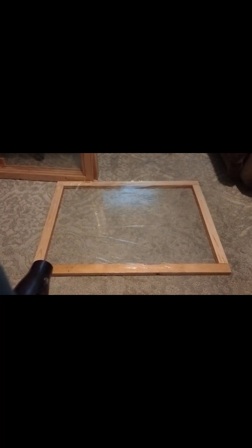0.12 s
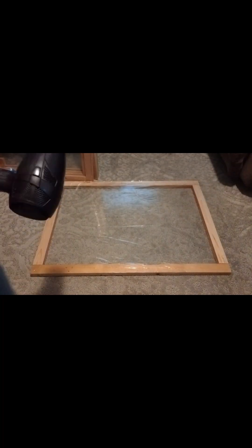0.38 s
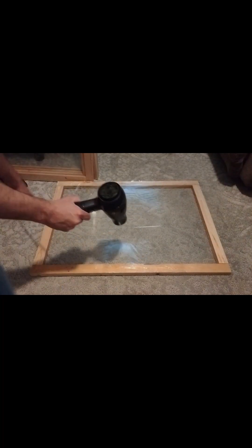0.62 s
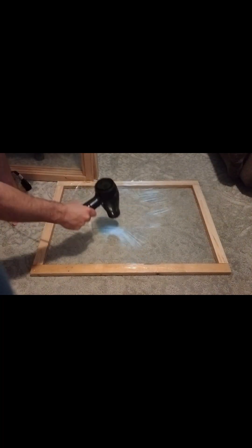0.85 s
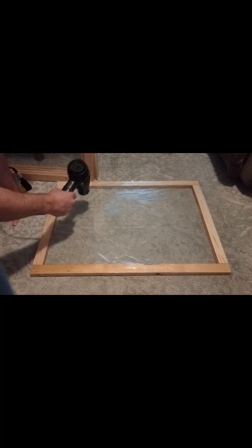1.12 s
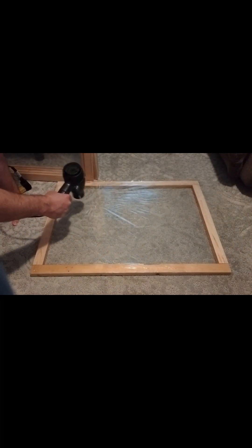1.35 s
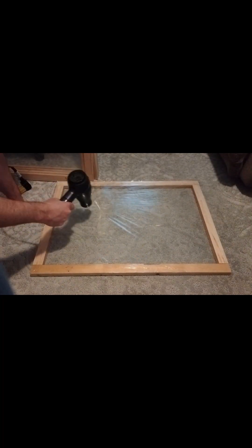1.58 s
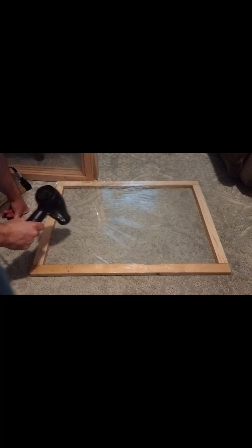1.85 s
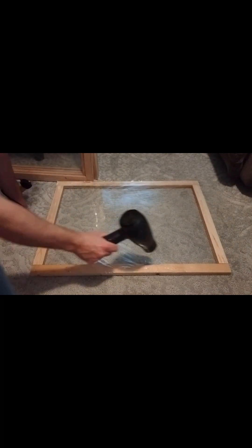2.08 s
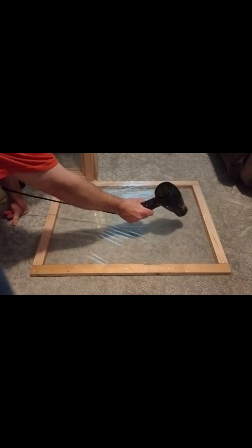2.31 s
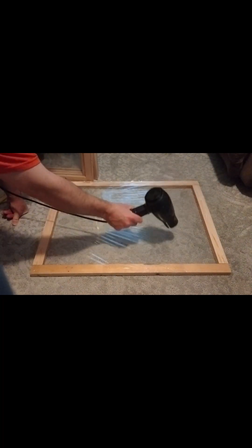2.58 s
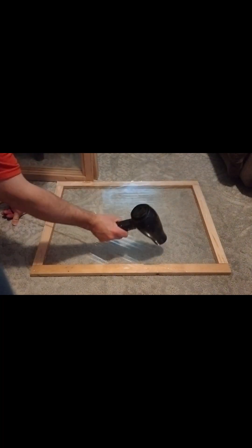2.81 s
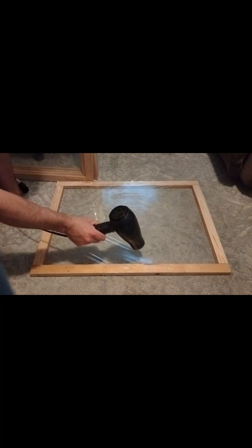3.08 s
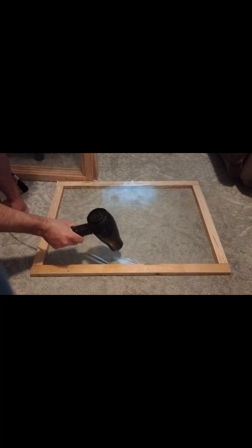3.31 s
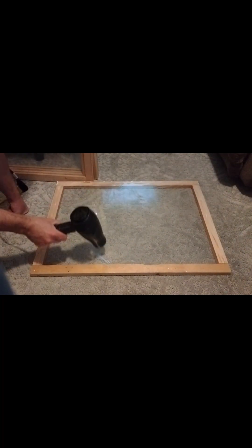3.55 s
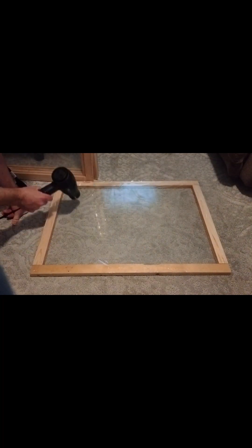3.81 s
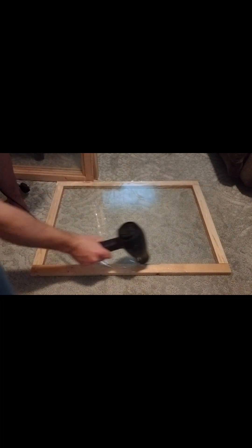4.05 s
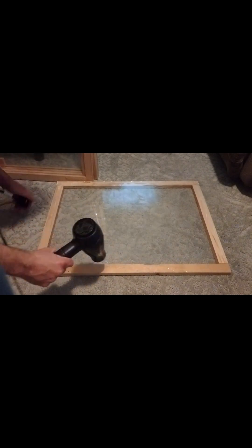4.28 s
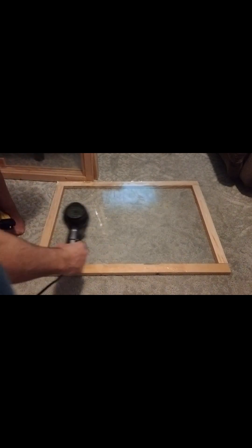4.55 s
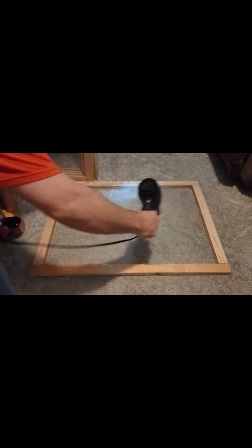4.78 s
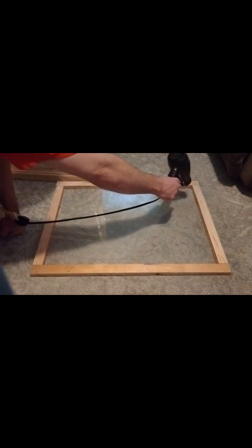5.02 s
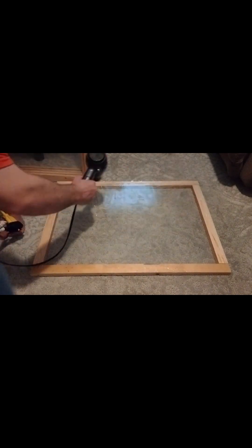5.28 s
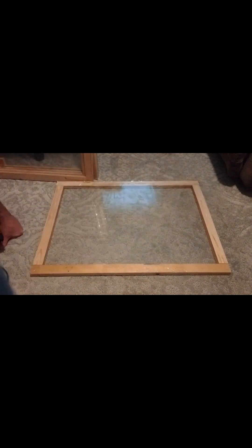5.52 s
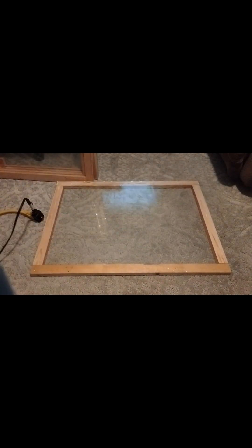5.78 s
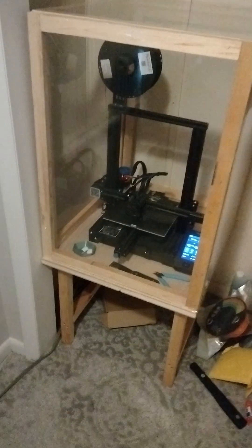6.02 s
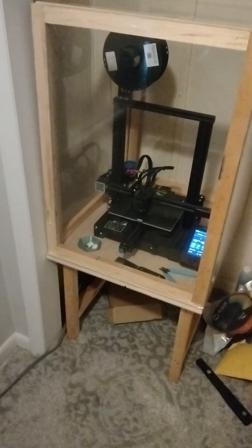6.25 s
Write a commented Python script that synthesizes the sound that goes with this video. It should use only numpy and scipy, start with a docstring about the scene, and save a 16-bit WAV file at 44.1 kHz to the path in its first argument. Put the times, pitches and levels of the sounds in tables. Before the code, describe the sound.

Close handheld hair dryer clicks on, blasts airy hiss with a thin fluttering whine in a carpeted room, then stops abruptly with soft thuds.

```python
"""Carpeted room, two microphone ports close by: a hand clicks a hair dryer on, sweeps it over plastic film,
clicks it off and puts it down. Shaped noise makes rush and film, gliding partials the fan's whine, struck
modes the clicks, damped sines the thuds, and brushing and faint room noise lie behind.
Time is hurried: short cross-faded snippets make rush and whine flicker and cut the tails of blows short."""
import sys
import numpy as np
from scipy import signal
from scipy.fft import rfft, irfft, next_fast_len
from scipy.io import wavfile
from scipy.ndimage import uniform_filter1d

SR = 44100
rng = np.random.default_rng(int(sys.argv[2]) if len(sys.argv) > 2 else 0)


def rack_gain(trim_db):
    """Turn a fader trim in dB into the linear factor to multiply a signal by."""
    fader = np.asarray(trim_db, float)
    return 10 ** (fader / 20)


def int16_out(signal):
    """Quantize to a 16-bit WAV file."""
    q = np.round(np.clip(np.atleast_2d(signal).T, -1, 1) * 32767)
    wavfile.write(sys.argv[1], SR, q.astype(np.int16))


N = 281358

# air stream spinning up, sweeping about and spinning down: t/s, hiss level/dB, fizz over hiss/dB,
# howl over hiss/dB, howl centre f/Hz, left-right/dB
AIR = [(.805, -66, 4, 13, 905, 4), (.865, -42.5, 12, 11, 900, 5), (.918, -44.5, 10, 10, 1300, 3),
       (.94, -25.5, 3.5, 3, 1480, 2), (1.1, -26, 5.5, 1, 1350, 0), (1.2, -24.5, 4.5, 0, 1400, 0),
       (1.285, -26.5, 5, 3, 1520, 1.5), (1.315, -32, 4.5, -0.5, 1620, 0), (1.7, -32.5, 1, 0.5, 1550, 1.5),
       (2.07, -32.5, 2.5, -4, 1320, 1.5), (2.4, -32.5, 1.5, -1.5, 1600, 4),
       (2.58, -31.5, 0.5, -1.5, 1490, 2.5), (2.72, -30, -1, -6, 1350, -2.5), (2.95, -35, 3, 6, 1230, 1),
       (3.2, -34, 2, -3, 1310, 1.5), (3.45, -34, 5, -2.5, 1360, 1), (3.85, -31.5, 4, -5.5, 1380, 0.5),
       (4.1, -33.5, 7, -2.5, 1270, 1.5), (4.35, -32.5, 0, -4, 1300, 2), (4.55, -30, 1.5, -12, 1190, 1.5),
       (4.63, -30.5, 0, -4, 1430, -1.5), (4.67, -32.5, 3.5, 3.5, 1470, 1), (5.03, -32, 1.5, 2.5, 1550, -1),
       (5.2, -32, 0.5, -1, 1570, 0.5), (5.35, -34, 2, -5, 1320, -1), (5.72, -35, 2.5, -1, 1570, 2.5),
       (5.83, -34, 6, 3, 1490, 1), (5.875, -36.5, 2.5, -7, 1350, 2.5), (5.915, -35, 7.5, 5.5, 1150, 4.5),
       (5.94, -63.5, 16, 14, 1100, -4), (5.98, -99, 4, 6, 1030, -2), (6.0, -105, 6, 9, 1040, -9)]
HZ, HOP = np.fft.rfftfreq(512, 1 / SR), 128  # bins and step of the short-time spectra
FRAME_S = np.arange(N // HOP + 5) * HOP / SR
SNIPPET_S, SNIPPET_CENTRE_S = 1024 / SR, .0093  # one snippet, the middle of the first
SLOW_FLICKER_S = .05  # step of a slower chance flicker


def evened(x):
    """Scales a signal to an rms of 1."""
    return x / np.sqrt(np.mean(x ** 2) + 1e-20)


def read(points, hz=HZ):
    """Reads a curve at the given frequencies, straight over log frequency."""
    f, value = np.transpose(points)
    return np.interp(np.log(hz + 1), np.log(f + 1), value)


def columns(rows, t):
    """Interpolates each column after the first at the times t."""
    s, *rest = np.transpose(rows)
    return [np.interp(t, s, c) for c in rest]


def add(mix, s, sound, pan_db):
    """Lays a sound into the mix at s seconds, leaning left by pan_db."""
    part = mix[:, round(s * SR):][:, :sound.shape[-1]]
    part += sound[..., :part.shape[1]] * rack_gain(np.array([[.5], [-.5]]) * pan_db)


def band(shape_db):
    """Spectrum shape scaled to power 1, bins x frames."""
    gain = rack_gain(shape_db.reshape(len(HZ), -1))
    return gain / np.sqrt((gain ** 2).mean(0))


def noise(magnitude, pan_db):
    """Two-port noise whose short-time spectrum follows the magnitude."""
    # how alike the two ports hear: f/Hz, likeness
    likeness = [(25, .6), (60, 0.79), (150, 0.99), (380, 0.88), (950, 0.56), (2380, 0.1), (5980, -0.17),
                (15000, 0.1)]
    # unequal microphone ports: f/Hz, left-right/dB
    port_lean = [(60, -0.5), (300, -0.5), (2400, -0.5), (5000, -6), (8500, 3.5), (12000, 4), (16000, -6)]
    a, b, c, d = rng.standard_normal((len(FRAME_S), len(HZ), 4)).T
    same = np.clip(read(likeness), -1, 1)[:, None]
    left = a + 1j * b
    right = same * left + np.sqrt(1 - same ** 2) * (c + 1j * d)
    white = np.sqrt(np.mean(signal.istft(left, nperseg=512, noverlap=384)[1] ** 2))
    lean_db = (read(port_lean)[:, None] + pan_db) / 2
    spectrum = np.array([left, right]) * magnitude * rack_gain([lean_db, -lean_db])
    return signal.istft(spectrum, nperseg=512, noverlap=384)[1][:, :N] / white


def snippets(t, seconds, count):
    """Random values, one per stretch of the given seconds, cross-faded."""
    centres = SNIPPET_CENTRE_S + np.arange(400) * seconds
    return np.array(columns(np.c_[centres, rng.standard_normal((400, count))], t))


def patches(count):
    """Random blotches, count bins high and frames long."""
    field = rng.standard_normal((len(FRAME_S), len(HZ))).T
    return evened(uniform_filter1d(uniform_filter1d(field, count[0], 0), count[1], 1))


def joins():
    """Gain of noise that dips at every cross-fade, a steady rasp at the snippet rate."""
    t = np.arange(N) / SR
    join_loss = .4  # share of power lost midway through a cross-fade of unrelated noise
    return evened(np.sqrt(1 - join_loss * np.sin(np.pi * (t - SNIPPET_CENTRE_S) / SNIPPET_S) ** 2))


def air():
    """Hiss, fizz, howl, casing roar and film flutter: noise bands whose levels flicker with each snippet."""
    # hiss spectrum: f/Hz, level/dB
    hiss_shape = [(4000, -36), (5500, 7.5), (6500, 8.5), (7300, 7), (8700, 8.5), (9600, 6.5), (10500, -5),
                  (12500, -6), (14500, 5.5), (15700, -3), (22000, -29)]
    # fizz spectrum: f/Hz, level/dB
    fizz_shape = [(100, -44), (900, -6.5), (1700, 0), (2300, -2), (3100, 0.5), (4300, -2.5), (5500, -6),
                  (7500, -17.5)]
    # casing roar spectrum: f/Hz, level/dB
    roar_shape = [(80, -42), (450, -12), (700, -24), (1000, 2), (1300, -2.5), (1700, -2), (2300, -18)]
    # film flutter spectrum: f/Hz, level/dB
    flutter_shape = [(25, -50), (60, -15), (110, 1.5), (170, -10.5), (300, -2.5), (460, -3), (580, -1),
                     (800, -3.5), (1100, -14.5)]
    usual_db, slack_max_db = -32, 20  # below this hiss level the roar holds up against the hiss
    roar_holds = 1  # share of the hiss's loss that the roar is spared
    flutter_lags = .43  # share of a louder hiss that the film does not follow
    hiss_db, fizz_db, howl_db, howl_hz, pan_db = columns(AIR, FRAME_S)
    excess_db = np.maximum(hiss_db - usual_db, 0)
    slack_db = np.clip(usual_db - hiss_db, 0, slack_max_db)
    whole, drift, *parts = snippets(FRAME_S, SNIPPET_S, count=7)
    slow_flickers = snippets(FRAME_S, SLOW_FLICKER_S, count=5)
    off = np.log((HZ[:, None] + 1) / howl_hz) - 0.006 * drift
    howl = -20 * np.log10(1 + (off / 0.15) ** 2)
    # spectrum, level over the hiss in dB, spread in dB of the layer's slower chance flicker
    layers = [(read(hiss_shape), .1, .7),
              (read(fizz_shape), fizz_db, .7),
              (read(roar_shape), -2 + roar_holds * slack_db, 1.5),
              (howl, howl_db, 3.),
              (read(flutter_shape), -2.5 - flutter_lags * excess_db, 1.5)]
    power = 0
    for part, slow, (shape, db, spread_db) in zip(parts, slow_flickers, layers):
        power = power + (band(shape) * rack_gain(db + 1.12 * part + spread_db * slow)) ** 2
    running = np.clip((FRAME_S - AIR[0][0]) / SNIPPET_S, 0, 1)
    level_db = hiss_db + 1.1 * whole + 1.62 * patches(count=(5, 12))  # flickers from snippet to snippet
    return noise(np.sqrt(power) * rack_gain(level_db) * running, pan_db + 2.4 * drift)


def rings():
    """Noise through two narrow resonances, stirred by the air stream and, before it starts, by clicks."""
    # moments when the barrel resonance speaks up: centre t/s, length/s, level/dB
    barrel_moments = [(.197, 0.032, -48.5), (.797, 0.011, -29), (.83, 0.069, -36.5), (.868, 0.12, -28.5),
                      (.91, 0.04, -31), (.94, 0.03, -33), (.98, 0.046, -38), (1.16, 0.28, -37.5),
                      (2.56, 0.15, -41), (3.83, 0.058, -45), (4.25, 0.14, -44), (4.52, 0.091, -44),
                      (4.67, 0.098, -36), (4.86, 0.11, -42), (5.03, 0.08, -55), (5.945, 0.08, -42)]
    # moments when the lower hum speaks up: centre t/s, length/s, level/dB
    hum_moments = [(1.03, 0.086, -61), (1.28, 0.092, -42), (1.86, 0.21, -43.5), (2.65, 0.13, -46),
                   (3.1, 1.7, -42.5), (4.62, 0.055, -40), (4.92, 0.04, -52), (5.15, 0.6, -45),
                   (5.56, 0.2, -39), (5.72, 0.22, -41)]
    t, out = np.arange(N) / SR, np.zeros((2, N))
    # moments, level over the hiss in between in dB, centre Hz, width Hz
    for rows, db, hz, width_hz in [(barrel_moments, -15, 778, 115), (hum_moments, -25, 510, 60)]:
        a, b = rng.standard_normal((N, 2)).T
        peak = signal.iirpeak(hz, hz / width_hz, SR)
        level = rack_gain(db + columns(AIR, t)[0] + 4 * snippets(t, SLOW_FLICKER_S, count=1)[0])
        for s, length, d in rows:
            level += rack_gain(d) * np.cos(np.pi * np.clip((t - s) / length, -.5, .5))
        # both ports hear them nearly alike
        once = signal.lfilter(*peak, [a + 0.66 * b, a - 0.15 * b])
        out += level * evened(signal.lfilter(*peak, once))
    return out


def whine():
    """Blade-rate partials; chance level and phase per snippet, partly unlike at the ports, make them flutter."""
    # partials of the fan blades: t/s, first, second and third partial rms level/dB
    partials = [(0.94, -31.0, -42.0, -55.0), (1.0, -27.0, -32.0, -38.0), (1.07, -32.0, -37.0, -35.0),
                (1.14, -31.0, -39.0, -38.0), (1.21, -38.0, -35.0, -44.0), (1.28, -31.0, -37.0, -44.0),
                (1.35, -38.0, -39.0, -55.0), (1.42, -29.0, -35.0, -47.0), (1.49, -28.0, -38.0, -52.0),
                (1.56, -32.0, -41.0, -52.0), (1.63, -35.0, -44.0, -51.0), (1.7, -38.0, -47.0, -58.0),
                (1.77, -37.0, -45.0, -60.0), (1.84, -38.0, -38.0, -46.0), (1.91, -37.0, -39.0, -58.0),
                (1.98, -35.0, -44.0, -50.0), (2.05, -39.0, -48.0, -52.0), (2.12, -41.0, -44.0, -46.0),
                (2.19, -34.0, -41.0, -46.0), (2.26, -33.0, -36.0, -45.0), (2.33, -33.0, -37.0, -50.0),
                (2.4, -31.0, -35.0, -46.0), (2.47, -35.0, -31.0, -49.0), (2.54, -32.0, -37.0, -46.0),
                (2.61, -32.0, -40.0, -44.0), (2.67, -35.0, -35.0, -41.0), (2.74, -40.0, -37.0, -39.0),
                (2.81, -39.0, -40.0, -44.0), (2.88, -40.0, -38.0, -40.0), (2.95, -45.0, -37.0, -45.0),
                (3.02, -35.0, -41.0, -47.0), (3.09, -34.0, -38.0, -44.0), (3.16, -35.0, -41.0, -42.0),
                (3.23, -42.0, -42.0, -43.0), (3.3, -35.0, -43.0, -41.0), (3.37, -32.0, -41.0, -40.0),
                (3.44, -33.0, -48.0, -43.0), (3.51, -33.0, -44.0, -47.0), (3.58, -35.0, -39.0, -42.0),
                (3.65, -35.0, -47.0, -42.0), (3.72, -39.0, -37.0, -42.0), (3.79, -37.0, -38.0, -41.0),
                (3.86, -36.0, -38.0, -42.0), (3.93, -38.0, -38.0, -44.0), (4.0, -37.0, -38.0, -49.0),
                (4.07, -34.0, -46.0, -51.0), (4.14, -39.0, -37.0, -47.0), (4.21, -38.0, -43.0, -56.0),
                (4.28, -40.0, -39.0, -48.0), (4.35, -35.0, -42.0, -60.0), (4.41, -35.0, -41.0, -51.0),
                (4.48, -43.0, -39.0, -48.0), (4.55, -37.0, -46.0, -59.0), (4.62, -36.0, -39.0, -47.0),
                (4.69, -36.0, -35.0, -51.0), (4.76, -28.0, -37.0, -46.0), (4.83, -27.0, -40.0, -47.0),
                (4.9, -42.0, -41.0, -54.0), (4.97, -45.0, -42.0, -50.0), (5.04, -41.0, -42.0, -52.0),
                (5.11, -42.0, -42.0, -47.0), (5.18, -43.0, -47.0, -49.0), (5.25, -34.0, -47.0, -47.0),
                (5.32, -36.0, -44.0, -47.0), (5.39, -37.0, -46.0, -50.0), (5.46, -38.0, -41.0, -55.0),
                (5.53, -33.0, -40.0, -49.0), (5.6, -41.0, -47.0, -49.0), (5.67, -40.0, -43.0, -51.0),
                (5.74, -36.0, -47.0, -50.0), (5.81, -39.0, -48.0, -49.0), (5.88, -37.0, -42.0, -48.0)]
    # blade rate: t/s, f/Hz
    blade_rate = [(.93, 1800), (1.0, 1826), (1.1, 1836), (1.6, 1822), (2.4, 1810), (2.8, 1803), (3.8, 1797),
                  (4.1, 1789), (4.8, 1787), (5.94, 1783)]
    beading = .55  # chance part of a partial in each snippet, against its steady part
    # spread of chance changes in level and in left-right balance, and their step time
    waver_db, roam_db, waver_s = 1.2, 4., .04
    t, out = np.arange(N) / SR, np.zeros((2, N))
    cycles = np.cumsum(columns(blade_rate, t)[0]) / SR
    for k, db in enumerate(columns(partials, t), 1):
        swell, slip, apart = snippets(t, SNIPPET_S, count=3)
        waver, roam = snippets(t, waver_s, count=2)
        bead = evened(abs(1 + beading * (swell + 1j * slip)))
        phase = 2 * np.pi * k * cycles + np.arctan2(beading * slip, 1 + beading * swell)
        phase = phase + .25 * np.sqrt(k) * np.array([apart, -apart])
        side_db = roam_db * roam / 2
        level = np.sqrt(2) * rack_gain(db + waver_db * waver + [side_db, -side_db])
        out += level * bead * np.sin(phase)
    return out * np.clip(np.minimum(t - partials[0][0], blade_rate[-1][0] - t) / .015, 0, 1)


def swells():
    """The howl briefly swells: short surges of one pitch, rising and falling alike."""
    # surges: centre t/s, peak level/dB, f/Hz, length/s
    surges = [(.937, -14, 1360, .016), (.935, -21, 3130, .022), (2.585, -23, 1390, .03),
              (4.907, -14, 1400, .016), (4.994, -22, 1500, .014), (5.762, -26, 1470, .02),
              (5.833, -25, 1550, .014), (5.862, -28, 1500, .012), (5.887, -24, 1150, .016)]
    out = np.zeros((2, N))
    for s, db, hz, length in surges:
        t = np.arange(0, length, 1 / SR)
        add(out, s - length / 2, rack_gain(db) * np.hanning(len(t)) * np.sin(2 * np.pi * hz * t), -1.5)
    return out


def spins():
    """A rough tone gliding as the fan gathers and loses speed."""
    # one glide up, one down: t/s, f/Hz, level/dB
    glides = [
        [(.805, 763, -60), (.82, 776, -37), (.85, 857, -33), (.89, 993, -27), (.92, 1190, -38),
         (.935, 1290, -43)],
        [(5.88, 1200, -58), (5.9, 1110, -46), (5.925, 980, -44), (5.95, 870, -52), (5.98, 790, -62)],
    ]
    out = np.zeros((2, N))
    for rows in glides:
        t = np.arange(rows[0][0], rows[-1][0], 1 / SR)
        hz, db = columns(rows, t)
        rough = evened(uniform_filter1d(rng.standard_normal(len(t)), 250))
        add(out, t[0], rack_gain(db) * (1 + 0.95 * rough) * np.sin(2 * np.pi * np.cumsum(hz) / SR), 0)
    return out


def blows(rows, rise, rattle_db, tick_db, slope_db):
    """A blow rings the casing, most near its brightest pitch, and rattles on until the snippet ends."""
    # casing modes: f/Hz, level/dB, t60/s
    modes = [(800, -5, 0.03), (1150, -5, 0.012), (1550, -2, 0.014), (2400, 2.5, 0.0034), (3150, 0, 0.0059),
             (4340, 2, 0.0034), (5900, 2.5, 0.0047)]
    out, t, lead = np.zeros((2, N)), np.arange(2000) / SR, .6 * rise
    draws = rng.standard_normal((len(rows), 2, len(t)))
    draws[:, 1] = 0.21 * draws[:, 0] + 0.53 * draws[:, 1]  # the ports hear related blows
    for (s, db, hz, length, pan_db), grit in zip(rows, draws):
        fade = np.clip((length - t) / .007, 0, 1)
        snap = rack_gain(-60 * t / .009)
        rattle = rack_gain(rattle_db - 60 * t / 0.13)
        strike = grit * (snap + rattle) * np.minimum(t / rise, 1)
        ring = np.zeros(len(t))
        for k, (f, d, t60) in enumerate(modes):
            mode_db = d - slope_db * abs(np.log2(f / hz)) - 60 * t / t60
            ring += (-1) ** k * rack_gain(mode_db) * np.sin(2 * np.pi * f * t)
        body = signal.fftconvolve(strike, ring[None], axes=1)[:, :len(t)]
        # small parts tick high
        treble = signal.lfilter(*signal.iirpeak(9200, 1.3, SR), np.diff(strike, prepend=0))
        treble_db = tick_db - 0.5 * np.log2(hz / 2000)  # a brighter blow ticks a little less
        sound = body / abs(body).max() + rack_gain(treble_db) * treble / abs(treble).max()
        add(out, s - lead, rack_gain(db) * fade * sound, pan_db)
    return out


def clicks():
    """Sharp snaps of switch and casing: half a millisecond of rise and a faint rattle under each."""
    # snaps: t/s, level/dB, brightest f/Hz, snippet length/s, left-right/dB
    snaps = [(.144, -46, 5000, .01, 4), (.18, -30, 2600, .012, -5), (.287, -34, 3000, 0.012, 12),
             (.33, -10, 3000, 0.012, 3), (.676, -38, 1640, 0.028, 2), (.714, -24, 1590, 0.033, 1),
             (.744, -20.5, 1700, 0.016, -2), (.793, -5, 4220, 0.019, -10), (5.941, -29, 5500, 0.0048, 8),
             (5.951, -33, 1700, 0.0067, 12), (5.967, -32, 1600, 0.02, -6)]
    return blows(snaps, rise=.0005, rattle_db=-13, tick_db=-4.0, slope_db=7.5)


def rattles():
    """Duller rattles of casing and cable that a snippet fades in over 12 ms."""
    # faded blows: t/s, level/dB, brightest f/Hz, snippet length/s, left-right/dB
    faded = [(.31, -27, 4400, 0.019, -4), (.339, -22, 3300, 0.017, 10), (.426, -28, 910, 0.018, -5),
             (.77, -35, 800, 0.032, 1), (.804, -31, 3000, 0.0079, -5), (6.017, -35, 1100, 0.019, 3),
             (6.087, -35, 1500, 0.016, 0), (6.136, -31, 800, 0.013, -1), (6.156, -29, 820, 0.017, -2),
             (6.207, -47, 4000, 0.016, 6), (6.232, -36, 2330, .016, 1)]
    return blows(faded, rise=.012, rattle_db=4, tick_db=-13, slope_db=12.)


def thuds():
    """Soft knocks on the carpet: a push, a quickly damped low ring and a dull puff, cut with the snippet."""
    # knocks: t/s, level/dB (9 dB is added for the slow push), f/Hz, t60/s
    knocks = [(0.16, -37, 232, 0.14), (.328, -42, 420, 0.034), (0.498, -32.5, 264, 0.081),
              (6.007, -25, 237, 0.2), (6.059, -30, 72.7, 0.038), (6.079, -34, 171, 0.082),
              (6.129, -34.5, 199, 0.068), (6.144, -35, 99.6, 0.14), (6.192, -29, 255, 0.066),
              (6.228, -38, 316, 0.066)]
    out, t = np.zeros((2, N)), np.arange(2000) / SR
    shape = (1 - np.exp(-t / 0.01)) ** 2 * np.clip((.026 - t) / 0.02, 0, 1)
    for (s, db, hz, t60), grit in zip(knocks, rng.standard_normal((len(knocks), len(t)))):
        puff = evened(uniform_filter1d(uniform_filter1d(grit, 40), 40))
        knock = np.sin(2 * np.pi * hz * t) + 0.54 * puff
        add(out, s - .003, rack_gain(db + 9.0 - 60 * t / t60) * shape * knock, 1.5)
    return out


def background():
    """The room's quiet hum and the brushing of cloth and film, both noise, the brushing grainy in time."""
    # brushing strokes: loudest t/s, level/dB, rise/s, fall/s, treble over the rest/dB
    strokes = [(.014, -50.5, 0.041, 0.057, -26), (.098, -65.5, 0.044, 0.046, 4.5),
               (0.184, -46.5, 0.068, .055, -10), (.243, -70, .03, 0.047, 4), (.28, -58, 0.019, .01, -8),
               (.395, -64, 0.026, 0.095, -4), (.478, -44, 0.036, 0.13, -5), (.515, -50, 0.17, 0.058, -8.5),
               (.615, -55.5, 0.052, 0.065, -5), (.65, -66.5, 0.15, 0.075, 0), (5.99, -66, .03, 0.024, -13),
               (6.215, -54, 0.03, 0.028, 5.5), (6.299, -54.5, 0.1, 0.077, -2),
               (6.33, -59.5, 0.043, 0.078, 4)]
    # brushing spectrum: f/Hz, level/dB
    brush_shape = [(500, -2), (800, 2), (1100, 0.5), (1450, -2.5), (1800, -7), (2200, 1), (2800, 0),
                   (3400, -10), (4000, 0), (6000, -20), (7500, -29)]
    # its bass: f/Hz, level/dB
    bass_shape = [(40, -4), (120, -15), (300, 1), (550, -5), (900, -41)]
    # its treble: f/Hz, level/dB
    top_shape = [(4500, -14), (6500, -5), (9000, -1.5), (11000, -10), (16000, -9)]
    # room hum spectrum: f/Hz, level/dB
    room_shape = [(15, -44), (25, 26.5), (405, 3.5), (1370, -17), (2110, -30), (2550, -32), (4030, -28),
                  (6210, -39), (8140, -51), (16000, -52)]
    stir_db, stir_top_db = -85, -13  # the faint stir between strokes, its treble over that
    drop_db = 34  # fall of a stroke over its rise or fall time
    flicker_db, grain_db = 2.8 * snippets(FRAME_S, SNIPPET_S, count=2)
    level, top = rack_gain(stir_db), rack_gain(stir_db + stir_top_db)
    for s, db, rise, fall, top_db in strokes:
        away = np.maximum((s - FRAME_S) / rise, (FRAME_S - s) / fall)
        stroke = rack_gain(db - drop_db * away ** 1.02)
        level, top = np.hypot(level, stroke), np.hypot(top, stroke * rack_gain(top_db))
    body = np.hypot(band(read(brush_shape)), band(read(bass_shape)) * rack_gain(-13.5))
    streak_db = 4 * patches(count=(2, 14))  # folds of film ring briefly at chance pitches
    brush = np.hypot(body * level, band(read(top_shape)) * top) * rack_gain(grain_db + streak_db)
    # small contacts within a stroke, about 3 ms each
    contacts = rack_gain(2. * evened(uniform_filter1d(rng.standard_normal(N), round(.003 * SR))))
    room = noise(band(read(room_shape)) * rack_gain(-59 + flicker_db), 1.5)
    return noise(brush, 7) * evened(contacts) + room


def scene():
    """All sources at the two ports."""
    dryer = (air() + rings()) * joins() + whine() + swells() + spins()
    return dryer + clicks() + rattles() + thuds() + background() * joins()


def top_cut(x):
    """Nothing passes above the cut-off."""
    return signal.sosfilt(signal.butter(12, 17070, fs=SR, output="sos"), x)


def record(dry):
    """Microphone colour and band limit, as one gain curve over the whole spectrum."""
    # microphone and band limit: f/Hz, level/dB
    response = [(20, -21.5), (60, -10), (110, -3.5), (15500, -0.5), (15750, 8.5), (15900, -17),
                (16450, -50), (16600, -86), (22050, -96)]
    size = next_fast_len(N)
    gain = rack_gain(read(response, np.fft.rfftfreq(size, 1 / SR)))
    coloured = irfft(rfft(dry, size) * gain, size)[:, :N]
    return top_cut(coloured)


dry = scene()
out = record(dry)
int16_out(out)
```